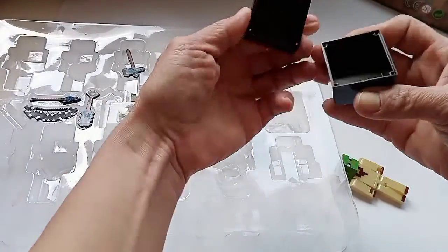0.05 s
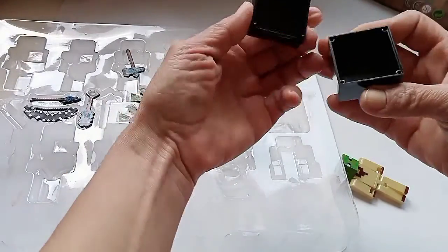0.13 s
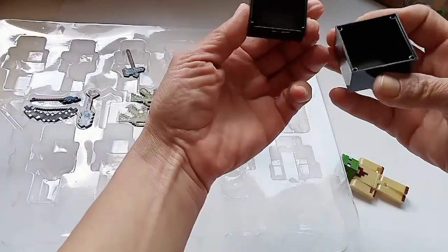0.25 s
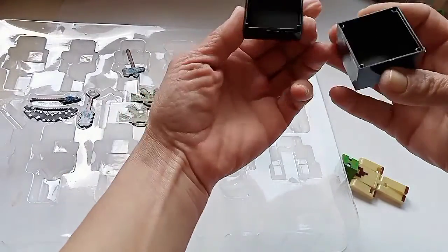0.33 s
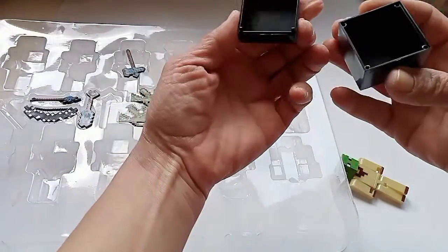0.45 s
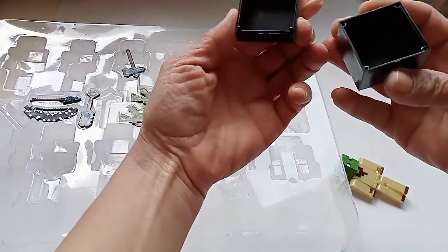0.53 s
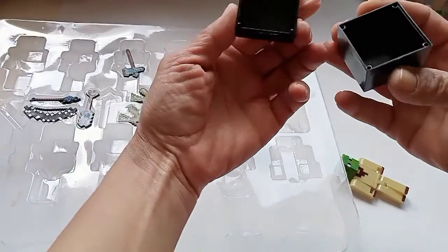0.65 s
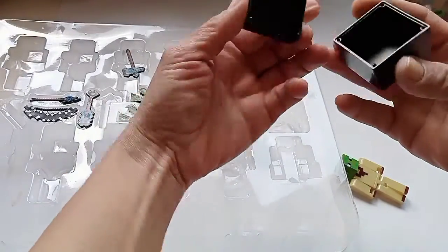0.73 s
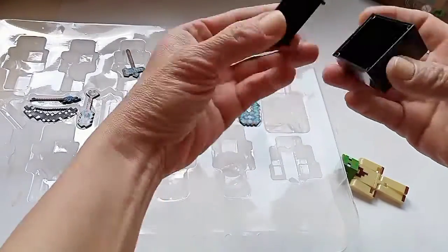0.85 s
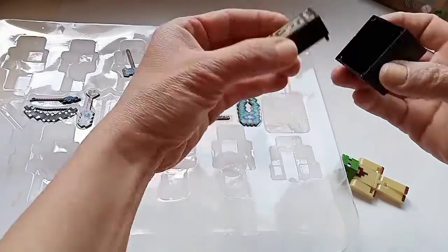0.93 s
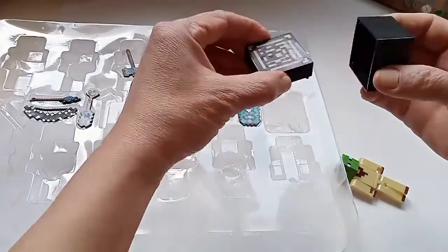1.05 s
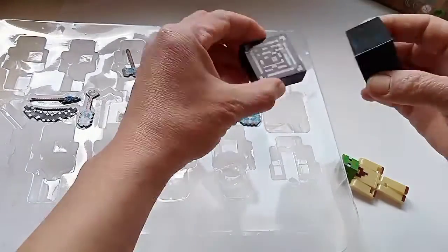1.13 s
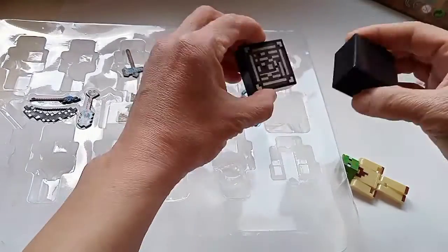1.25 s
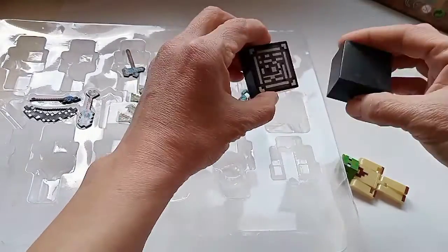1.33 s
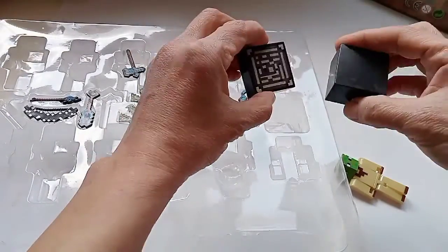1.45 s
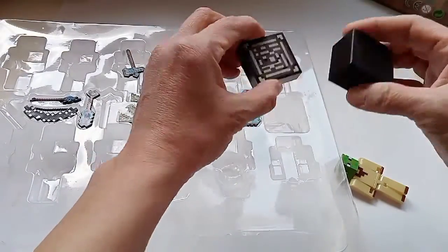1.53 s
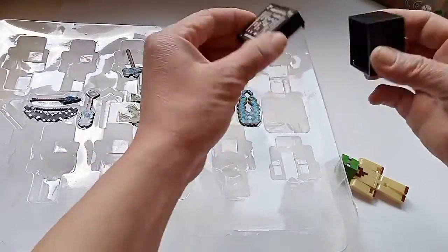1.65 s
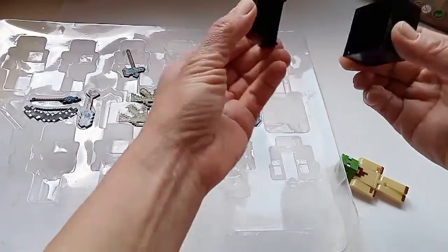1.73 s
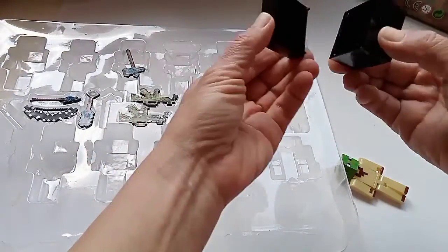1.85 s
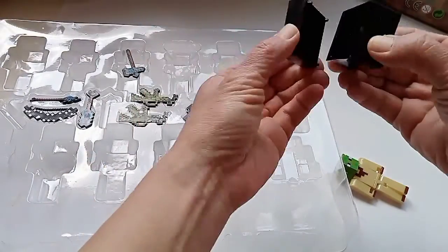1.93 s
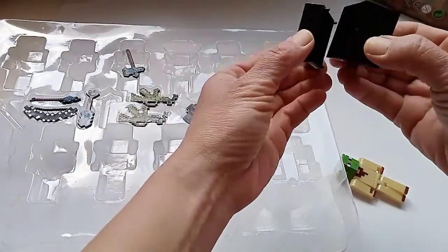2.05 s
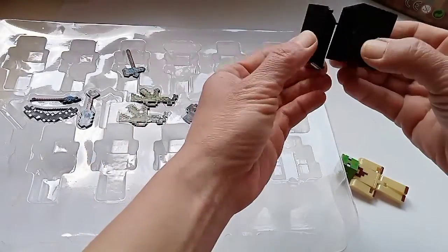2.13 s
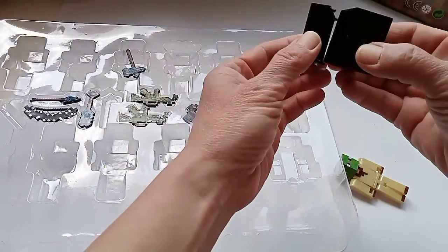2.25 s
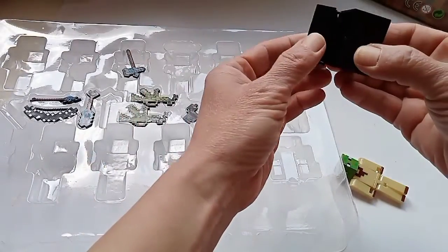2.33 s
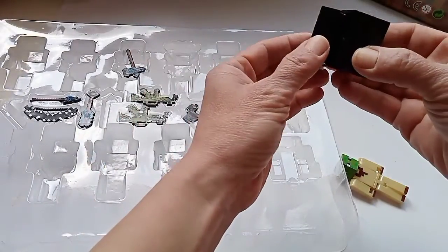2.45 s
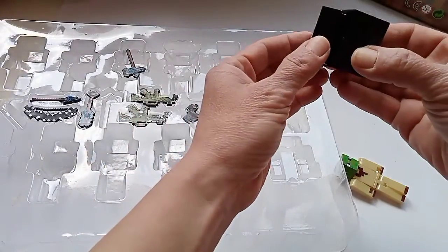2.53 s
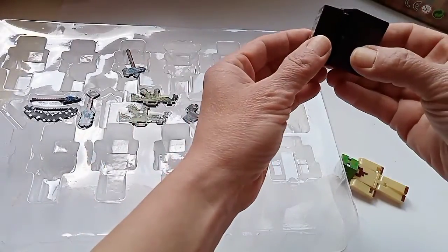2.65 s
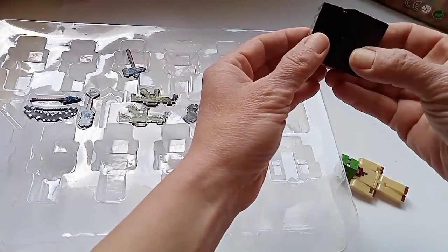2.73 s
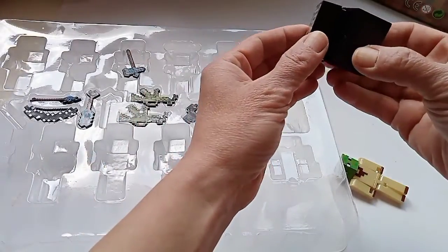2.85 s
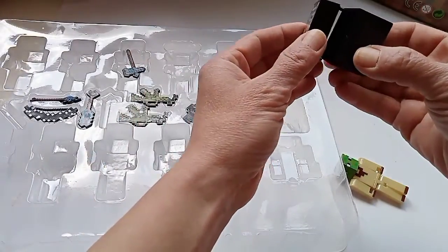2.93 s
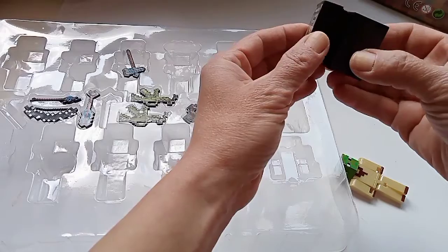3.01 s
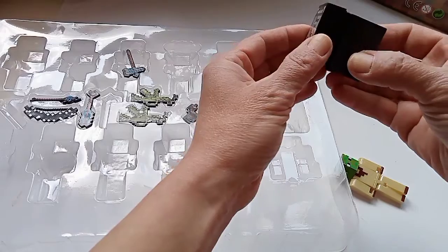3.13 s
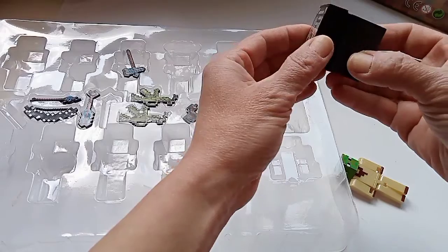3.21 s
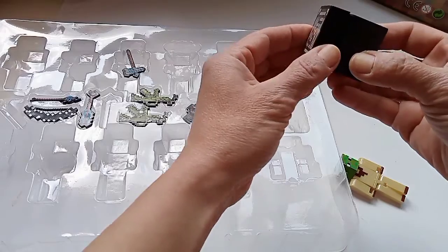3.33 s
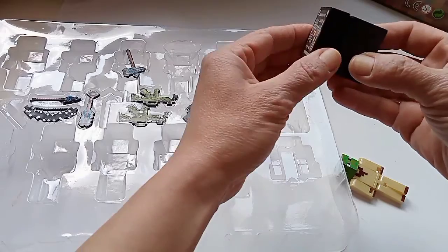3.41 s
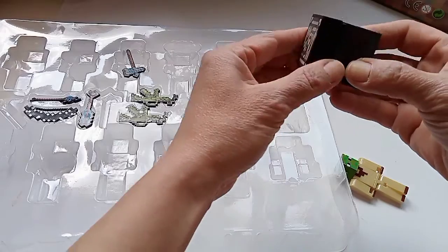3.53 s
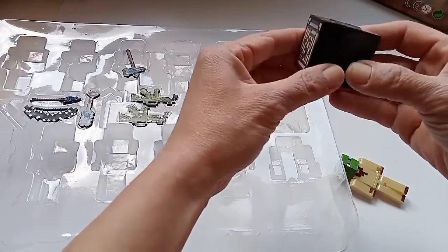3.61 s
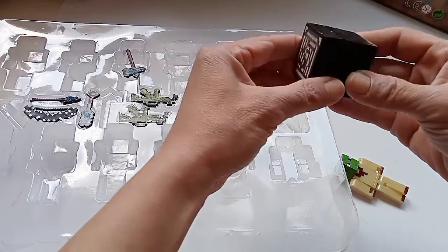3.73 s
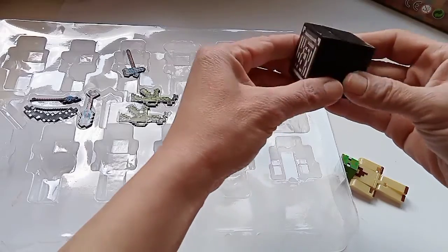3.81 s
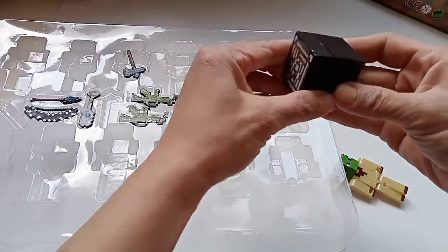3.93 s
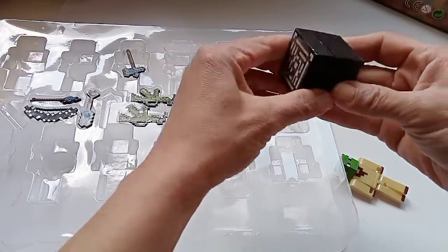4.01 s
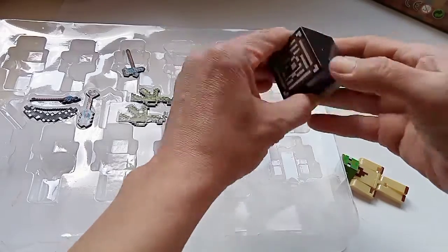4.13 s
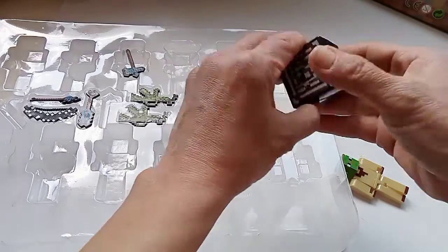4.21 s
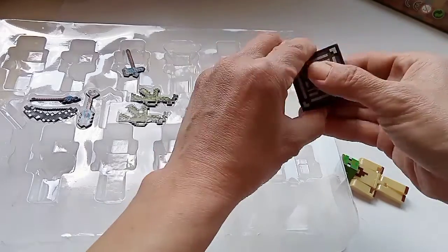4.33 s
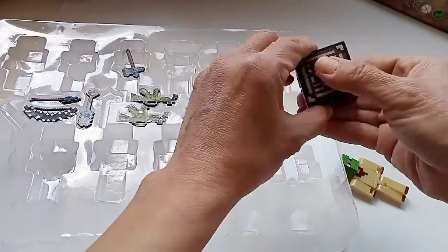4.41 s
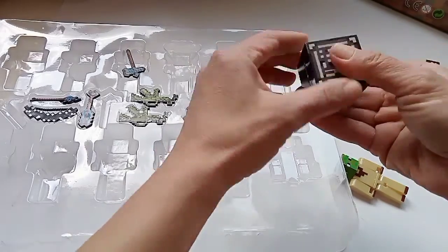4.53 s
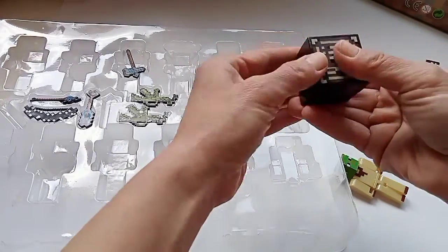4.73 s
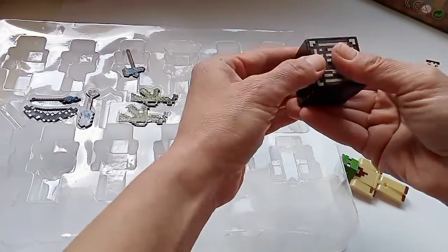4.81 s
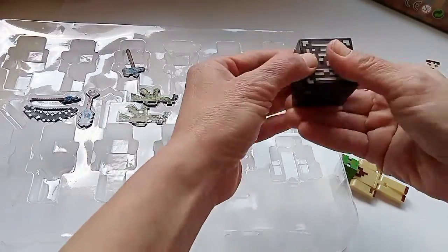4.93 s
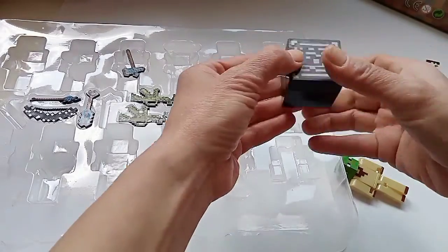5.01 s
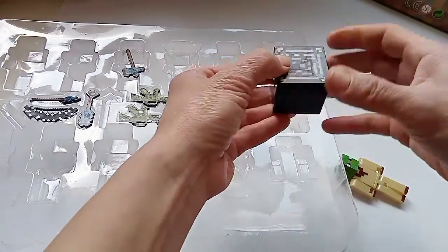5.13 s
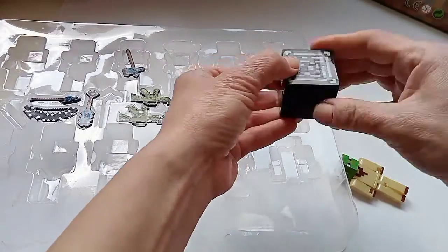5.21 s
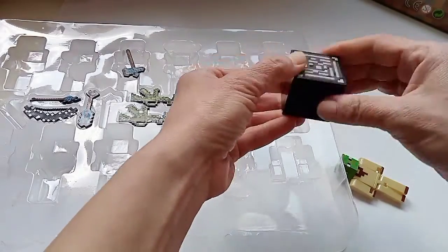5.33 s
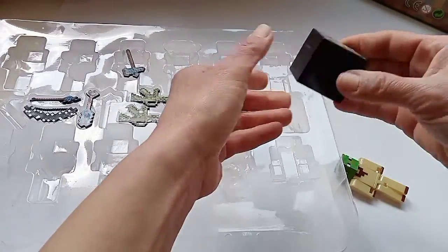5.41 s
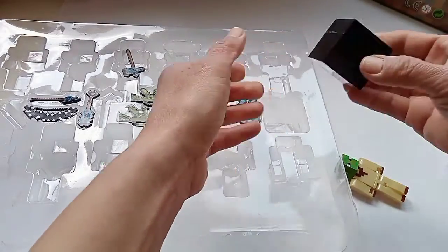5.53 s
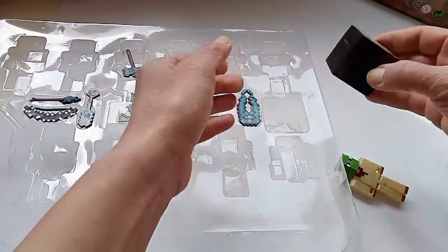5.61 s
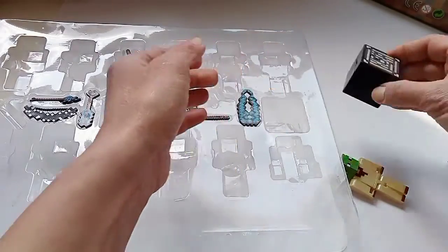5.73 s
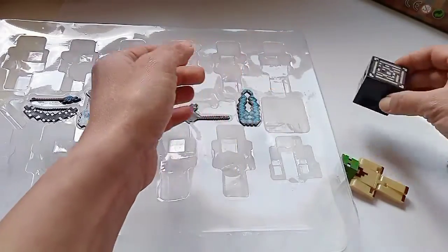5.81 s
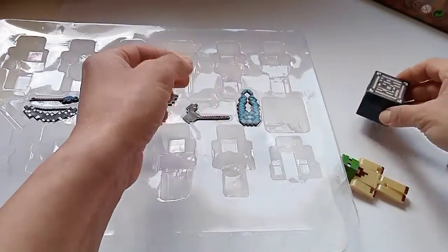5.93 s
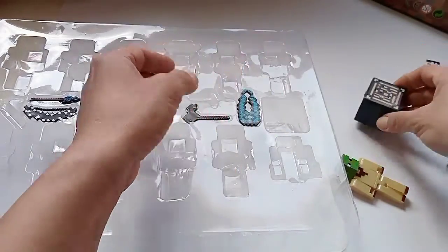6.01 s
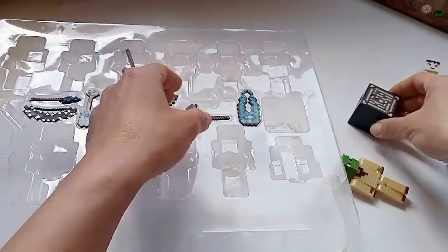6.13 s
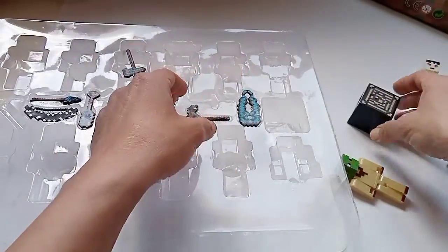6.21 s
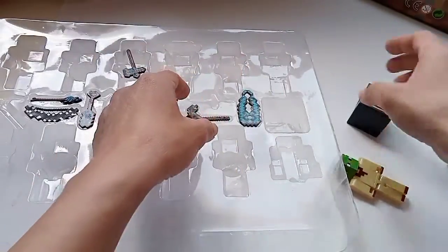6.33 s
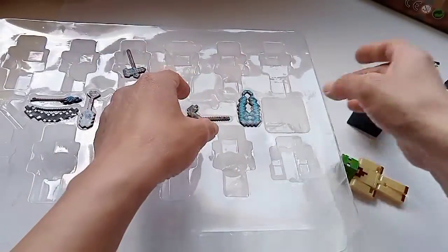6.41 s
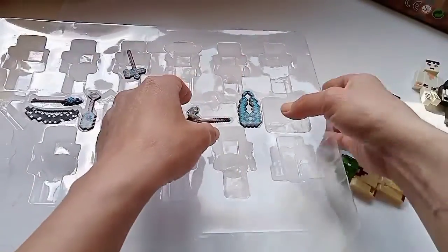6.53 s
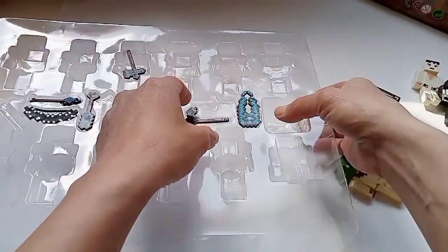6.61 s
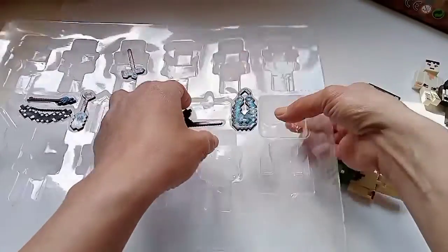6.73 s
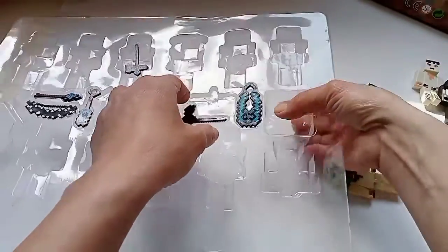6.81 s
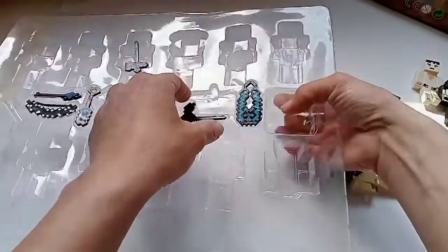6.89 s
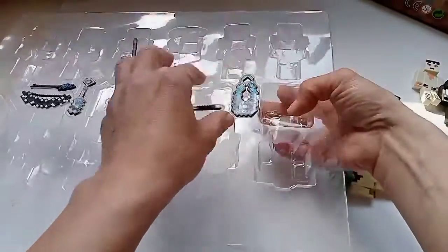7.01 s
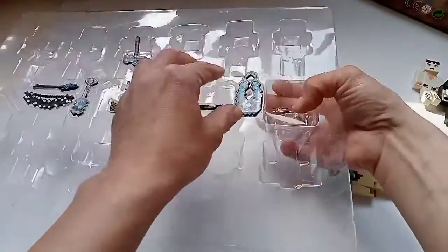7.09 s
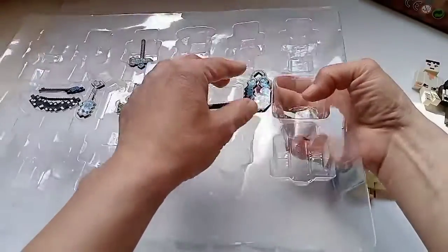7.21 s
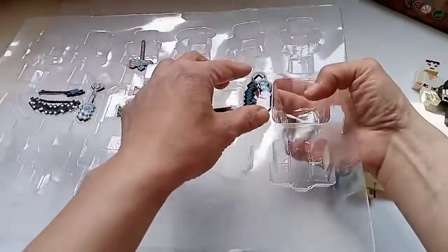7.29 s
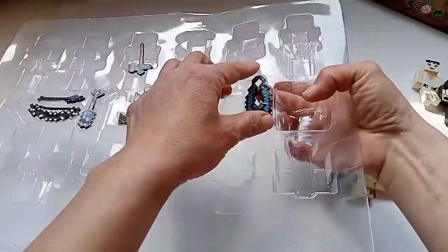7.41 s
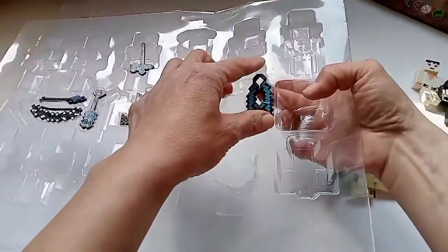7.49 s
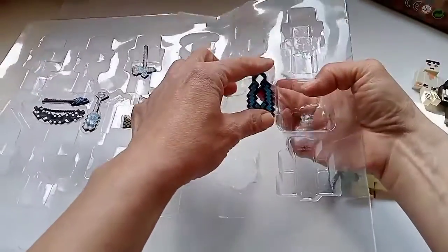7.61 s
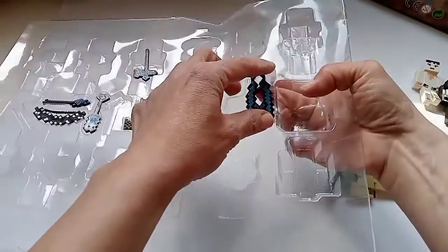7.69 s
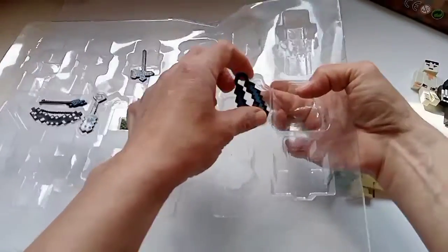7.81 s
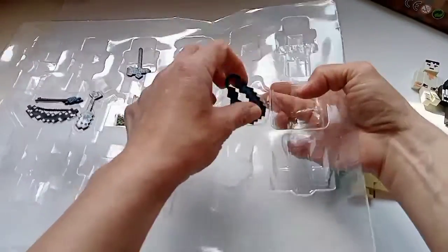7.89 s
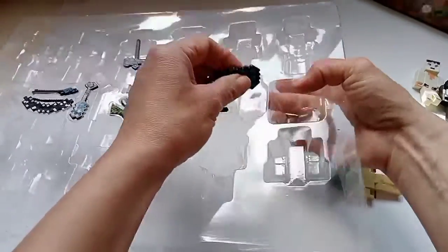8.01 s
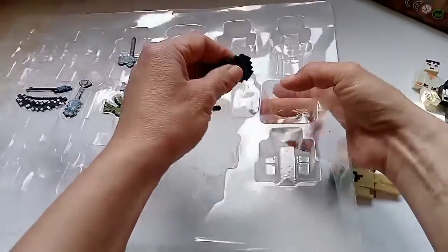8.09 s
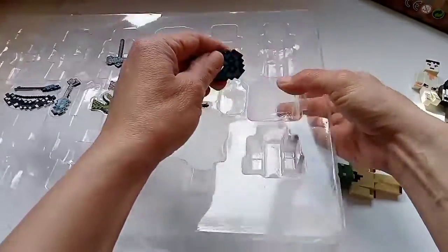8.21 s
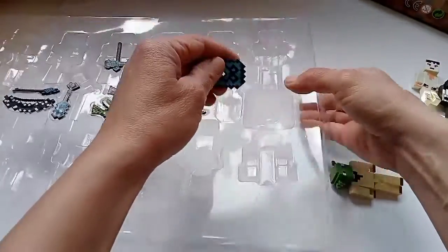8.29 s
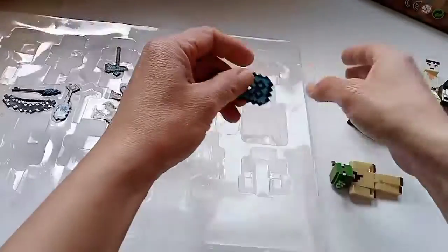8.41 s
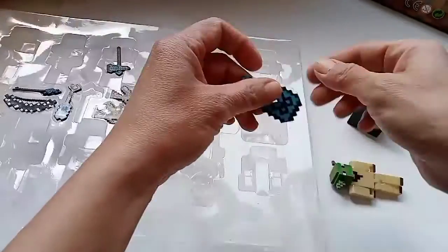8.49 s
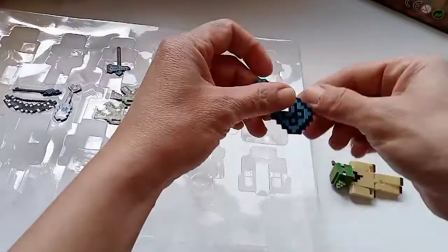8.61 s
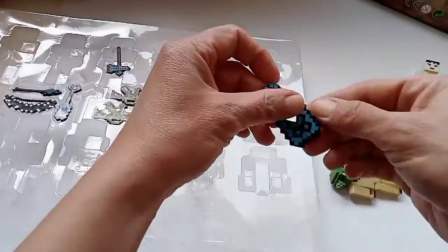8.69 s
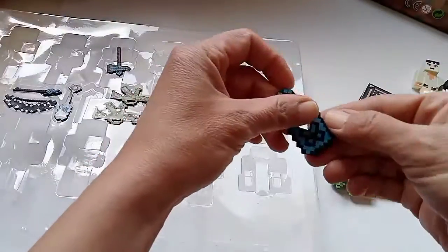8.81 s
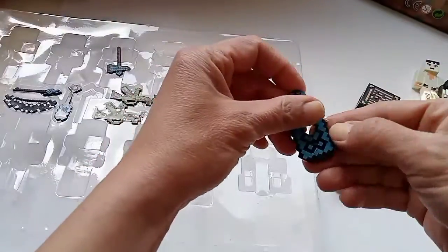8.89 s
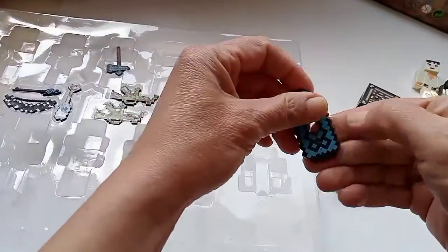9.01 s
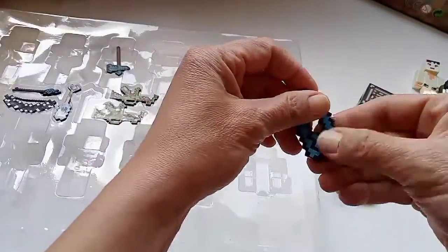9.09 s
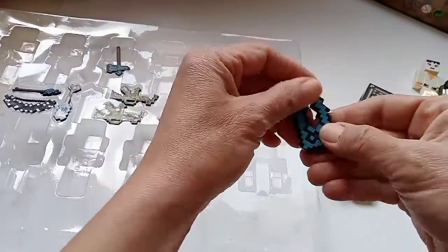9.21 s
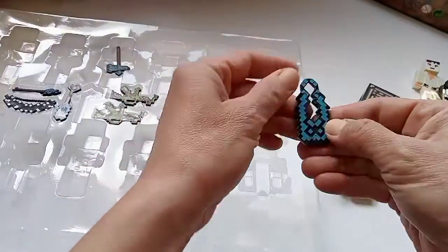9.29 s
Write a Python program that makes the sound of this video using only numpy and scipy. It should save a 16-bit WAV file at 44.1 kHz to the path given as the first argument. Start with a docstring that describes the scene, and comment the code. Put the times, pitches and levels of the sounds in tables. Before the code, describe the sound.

Close up in a small room, fingers rub faintly on a little hollow plastic box. Light ticks come first, then a quick, strengthening series of hard clicks as its lid is pressed home. After a quiet gap, a stiff blister sheet bends with loud irregular crackles, sharp pops and creaks, ending in a short dragging rustle and quiet. Faint air noise stays beneath.

```python
"""First, hands turn a small hollow plastic box, click its lid home and set it on a table: bursts of modes.
Then they bend a stiff plastic blister sheet to pry a piece out: it creaks, rumbles and snaps as
random slips and sudden bursts excite its pockets. Fingers rustle and rub by filtered friction noise.
A small room answers with a diffuse echo over faint steady air noise, and the recorder's limiter
ducks round the sharpest peaks."""
import sys
import numpy as np
from scipy import signal
from scipy.io import wavfile
from scipy.ndimage import uniform_filter1d, minimum_filter1d

SR = 44100
rng = np.random.default_rng(int(sys.argv[2]) if len(sys.argv) > 2 else 0)


def file_out(sig):
    """Save sig as 16-bit WAV at sys.argv[1]."""
    # one column per channel
    cols = np.atleast_2d(sig).T
    # limit, then scale
    lim = np.clip(cols, -1, 1)
    pcm = np.round(lim * 32767).astype(np.int16)
    wavfile.write(sys.argv[1], SR, pcm)


N = 412315
TAPS = 4096  # samples in a burst or filter
HZ = np.fft.rfftfreq(TAPS, 1 / SR)
AGE = np.arange(TAPS) / SR  # seconds since a burst began
TIME = np.arange(N) / SR

# Knocks of the box. Each row: start in seconds, body level in dB, body centre in Hz,
# level of the bright crack in dB.
BOX_KNOCKS = [(0.0935, -49, 4170, -45.5), (2.2893, -40, 1830, -55.5), (2.3565, -33, 1680, -54),
              (2.483, -40, 1710, -61), (2.609, -42.5, 1910, -53.5), (2.6797, -44.5, 1820, -77),
              (2.7245, -44, 2050, -51.5), (2.835, -70, 5900, -68), (2.8655, -64, 6200, -77),
              (3.0834, -27, 1840, -46.5), (3.0867, -26.5, 1920, -51.5), (3.107, -27.5, 1740, -51),
              (3.1806, -28, 1700, -51.5), (3.1983, -31.5, 1560, -59.5), (3.2674, -35.5, 1660, -62),
              (3.317, -24, 1710, -57), (3.3195, -21.5, 1870, -41.5), (3.621, -23, 1700, -49),
              (3.6254, -13, 1790, -36), (3.756, -26.5, 1570, -36), (3.7593, -26, 1490, -32),
              (3.78, -26, 1440, -45), (3.808, -21, 1540, -34), (3.8668, -23, 1530, -27),
              (3.9308, -21, 1418, -25.5), (4.35, -25, 1320, -31), (4.372, -28, 1180, -32.5),
              (4.4349, -24.5, 1130, -27.5), (4.5325, -21.5, 1330, -22), (4.6928, -19.5, 2000, -16),
              (4.7519, -17, 2440, -12), (5.0385, -39, 2830, -36.5), (5.2816, -56, 2430, -58),
              (6.1186, -52.5, 2210, -44), (6.211, -42, 856, -56)]
# The sheet buckling. Each row: start in seconds, strength in dB, tilt in dB per octave
# (wide panels are dull, tight creases bright).
SHEET_SNAPS = [(6.5937, -35.5, 3), (6.691, -44, 11), (6.7036, -28, -5.5), (6.7157, -24, -1.5),
               (6.7528, -26, 4.5), (6.7724, -21, 0.5), (6.784, -12, 0.4), (6.8251, -23.5, 1),
               (6.8317, -19, 2), (6.8357, -19, 0.5), (6.9029, -23, 3), (6.9252, -19.5, -3.5),
               (6.9347, -24.5, 6), (6.9389, -13, 0.7), (6.9575, -30.5, -4.5), (6.9972, -35, 5),
               (7.0327, -14, -1.7), (7.0524, -49, 14.5), (7.1356, -28, 5.5), (7.1534, -24, -1),
               (7.1651, -18.5, 4), (7.1661, -17.5, 0.5), (7.213, -31.5, 12), (7.2399, -36, 7),
               (7.2719, -21, 1.1), (7.281, -37, 8), (7.3294, -37.5, 1), (7.422, -31.5, -1),
               (7.4345, -32.5, 6.5), (7.4492, -22, 5.5), (7.454, -27.5, 6), (7.472, -30, 6),
               (7.5077, -18.5, 5), (7.5638, -24.5, 0.3), (7.6093, -36.5, -6.5), (7.6223, -27.5, -3.7),
               (7.6335, -21.5, .2), (7.6672, -20, -1), (7.6721, -14.5, -0.3), (7.7237, -13, 1.4),
               (7.7288, -30.5, 8.5), (7.8496, -19, 3), (7.9252, -34, 4.2), (7.9475, -19.5, 2.5),
               (7.9745, -25.5, 5.5), (7.982, -21.5, 2), (8.0185, -25.5, -5.5), (8.0373, -19, 1.6),
               (8.0562, -20.5, -1.5), (8.0667, -18, 2.7), (8.0735, -18, 1), (8.1213, -14.5, 0.5),
               (8.1431, -34, 5), (8.1624, -26, 1), (8.1975, -20.5, 4.2), (8.4228, -19.5, 0.2),
               (8.4476, -33, 5.5), (8.6199, -42, -0.3), (8.721, -46.5, 9), (8.728, -29, 4)]
# Parts of every snap: panel, crease, crack, fizz. Each row: level in dB against the strength,
# distance in octaves from the tilt's pivot.
SNAP_PARTS_DB = [(-6, -2.14), (-1.6, -1.28), (-2, 0.19), (-4.5, 1.79)]
# How hard the hands bend the sheet. Each row: time in seconds, level in dB.
HAND_STRAIN = [(6.514, -34.5), (6.67, -33.5), (6.8, -23), (6.95, -27), (7.1, -32), (7.25, -35), (7.42, -35),
               (7.49, -42.5), (7.62, -29.5), (7.72, -38), (7.83, -39.5), (7.9, -26.5), (8.0, -38),
               (8.05, -20.5), (8.11, -35.5), (8.17, -24), (8.21, -32), (8.42, -24.5), (8.58, -42.5),
               (8.72, -56.5)]
# The sheet dragging over the table as it is gripped and let go. Each row: start in seconds,
# length in seconds, level in dB, tilt above 500 Hz in dB per octave.
TABLE_DRAGS = [(6.516, 0.042, -23, 0), (8.253, 0.02, -25.5, -1.5), (8.336, 0.13, -24.5, -2.5)]
# Fingers sliding on plastic. Each row: middle in seconds, standard deviation of the bell in seconds,
# level in dB before the rustle's overall gain.
FINGER_STROKES = [(0.097, 0.013, -49), (0.316, 0.051, -58), (.574, 0.011, -60), (0.73, 0.055, -59),
                  (1.017, .015, -57), (1.05, 0.11, -55), (1.654, 0.032, -55), (1.811, 0.061, -54.5),
                  (3.196, .015, -56), (3.342, 0.036, -54), (3.512, 0.019, -49.5), (4.094, 0.015, -49.5),
                  (4.292, .047, -53), (4.962, 0.016, -37), (5.03, 0.018, -37.5), (5.285, 0.0085, -49.5),
                  (5.376, 0.024, -46), (6.154, 0.016, -45.5), (6.215, 0.03, -52), (8.981, 0.0081, -55),
                  (9.26, 0.042, -57.5)]
# Rubs that set a surface singing, from low groans to thin squeaks. Each row: middle in seconds,
# standard deviation of the bell in seconds, level in dB, resonance in Hz, its width in Hz.
SINGING_RUBS = [(1.025, .016, -64, 4320, 250), (1.067, 0.072, -61, 5880, 400), (1.098, .19, -78, 2530, 300),
                (1.66, 0.023, -59.5, 2570, 220), (2.601, 0.17, -63, 1850, 500),
                (2.602, .1, -67, 6000, 1200), (3.14, 0.031, -45.5, 1900, 994),
                (3.299, 0.14, -59.5, 90, 91.6), (3.502, 0.027, -43, 1770, 583),
                (3.691, .047, -46.5, 1650, 352), (3.94, 0.016, -53.5, 1010, 250),
                (4.442, .027, -44.5, 785, 200.8), (6.22, 0.045, -51, 700, 606),
                (7.064, 0.037, -31.5, 616, 159), (8.416, 0.076, -26.5, 910, 667),
                (8.573, 0.029, -38.5, 664, 202.5), (8.739, 0.008, -34.5, 6530, 1872)]
# Colour of the sheet. Each row: frequency in Hz, relative density in dB per Hz.
SHEET_COLOUR = [(40,-24.5),(110,-16.5),(240,-13),(370,-2.5),(700,-4.5),(1070,-0.5),(1760,-5.5),(2600,-4.5),(3300,-8.5),(4700,-6),(7600,-12),(9400,-4),(12000,-17.5),(16000,-21)]
# A sharp click of the box with its wall resonances. Each row: frequency in Hz, relative density in dB per Hz.
CRACK_COLOUR = [(2900,-6),(3250,-2),(3800,0),(4400,-2.5),(4750,-0.5),(5250,4.5),(6500,-4),(7300,-4),(8000,-4.5),(9900,0.5),(11500,-13.5),(16000,-18.5)]
# Skin on the box with its wall resonances. Each row: frequency in Hz, relative density in dB per Hz.
SKIN_COLOUR = [(900, -17), (2100, -12), (2580, -0.5), (3100, -11.5), (4300, -5), (5200, -8.5), (5900, -5),
               (7000, -9), (8300, -7.5), (9400, 4.5), (11000, -11), (16000, -12)]
# Still room air. Each row: frequency in Hz, relative density in dB per Hz.
AIR_COLOUR = [(20,-20),(45,-9),(86,-1),(194,0.5),(300,-4.5),(600,-7.5),(1320,-13),(5000,-18),(7670,-24.5),(9460,-18.5),(11100,-25.5),(16000,-32)]
# Late decay of the room. Each row: frequency in Hz, time to fall 60 dB in seconds.
LATE_T60 = [(200,1.3),(800,0.97),(2000,1),(5000,1.1),(9000,0.68),(15000,0.97)]
# Strength of the room. Each row: frequency in Hz, level of the echo in dB against the sound sent to it.
ECHO_DB = [(150,-9),(700,-9.5),(2000,-15),(5000,-12.5),(9500,-14.5),(15000,-13.5)]

# A knock's hardness is its crack over its body; hard knocks and low knocks ring over a wider band.
# The reach is the distance from the body's centre at which its gain is 7 dB down.
BODY_HZ, BODY_REACH_OCTAVES, MIN_REACH_OCTAVES = 1700, 0.32 * 2.62, 0.1 * 2.62
WIDEN_HARDNESS_DB, WIDEN_WITH_DEPTH = 22, 0.52  # dB of hardness, and power per octave down, for the reach
# The thud's level is set against the mean of body and crack; low knocks thud more.
THUD_DB, THUD_DB_PER_OCTAVE = -16.5, -14
# Cracks above this level tilt up, by at most so many dB per octave; weaker ones tilt down.
BRIGHT_FROM_DB, BRIGHT_MAX_DB = -36.5, 5.5
# Each snap leaves the sheet shaking: dB against the snap, seconds to fall 60 dB.
SHUDDER_DB, SHUDDER_T60 = -19.5, 0.25
WOBBLE_DB, CRACKLE_DB = -1.5, -6.5  # both against the strain
DRAG_ATTACK_S, DRAG_RELEASE_T60 = 0.0028, 0.23
EDGE_HZ = 15700  # upper band limit of the recorder


def amp(db):
    """Decibel law: level in dB to amplitude gain."""
    return 10 ** (np.asarray(db) / 20)


def unit(x):
    """Normalisation of power: scales a signal to rms 1."""
    return x / np.sqrt(np.mean(x ** 2) + 1e-20)


def read(points, hz):
    """Interpolation of a spectrum on a logarithmic frequency axis."""
    f, value = np.transpose(points)
    return np.interp(np.log(hz + 1), np.log(f + 1), value)


def level(rows, column):
    """Envelope: a curve in dB becomes a gain over time, silent outside its span."""
    rows = np.asarray(rows)
    return amp(np.interp(TIME, rows[:, 0], rows[:, column], left=-200, right=-200))


def add(mix, s, sound):
    """Superposition: adds a sound into the mix from time s."""
    part = mix[max(round(s * SR), 0):][:len(sound)]
    part += sound[:len(part)]


def band(lo_hz, hi_hz, order=8):
    """Band-pass response with smooth, steep sides."""
    return 1 / np.sqrt((1 + (lo_hz / (HZ + 1)) ** order) * (1 + (HZ / hi_hz) ** order))


def colour(x, gain):
    """Minimum-phase filtering: a causal filter rings after a click, never before."""
    log_gain = np.log(np.maximum(gain / gain.max(), 1e-5))
    circle = np.concatenate([log_gain, log_gain[-2:0:-1]])
    # The Hilbert transform of the log gain gives the phase of the causal filter.
    taps = np.fft.ifft(np.exp(np.conj(signal.hilbert(circle)))).real
    return signal.oaconvolve(x, taps)[:len(x)]


def burst(gain, db, t60, kick):
    """Impulsive release: a first kick, then dense modes dying fast."""
    ring = unit(rng.standard_normal(TAPS) * amp(-60 * AGE / t60))
    ring[0] += kick * np.sqrt(TAPS) * rng.choice([-1, 1])
    per_10_ms = np.sqrt(SR / 100 / TAPS)  # db states the whole energy as an rms over 10 ms
    return amp(db) * unit(colour(ring, gain)) * per_10_ms


def grains(per_s, spread_db, t60):
    """Stick-slip as a random point process: tiny slips of uneven size, each a short puff of noise."""
    size_db = spread_db * np.minimum(rng.exponential(1, N), 3)
    size = amp(size_db) * (rng.random(N) < per_s / SR)
    power = signal.oaconvolve(size ** 2, amp(-120 * AGE / t60))[:N]  # power falls 60 dB in t60
    return np.sqrt(abs(power)) * rng.standard_normal(N)


def swell(t, s, half_s):
    """Gaussian envelope: a stroke speeds up and slows down in a bell shape."""
    return np.exp(-0.5 * ((t - s) / half_s) ** 2)


def box(brighten=0.35):
    """Impact excitation: the lid catches and slips, the hollow body knocks; harder slips crack and thud more."""
    out = np.zeros(N)
    crack = amp(read(CRACK_COLOUR, HZ)) * band(2800, 13000)
    thud = band(300, 540, order=3)
    octaves_above_5k = np.log2(np.maximum(HZ, 5000) / 5000)
    for s, body_db, hz, crack_db in BOX_KNOCKS:
        height = np.log2(hz / BODY_HZ)
        hardness_db = crack_db - body_db
        reach = BODY_REACH_OCTAVES * 2 ** (hardness_db / WIDEN_HARDNESS_DB - WIDEN_WITH_DEPTH * height)
        away = np.log2((HZ + 1) / hz) / max(reach, MIN_REACH_OCTAVES)
        body = (1 + away ** 4) ** -1.2
        thud_db = (body_db + crack_db) / 2 + THUD_DB + THUD_DB_PER_OCTAVE * height
        # A louder crack is a brighter one.
        tilt_db = min(brighten * (crack_db - BRIGHT_FROM_DB), BRIGHT_MAX_DB) * octaves_above_5k
        add(out, s, burst(body, body_db, t60=0.02, kick=1.1))
        add(out, s, burst(crack * amp(tilt_db), crack_db, t60=0.013, kick=0.5))
        add(out, s, burst(thud, thud_db, t60=0.016, kick=1.8))
    return out


def pocket():
    """Modal irregularity: each pocket has its own random peaks and dips, wider towards the treble."""
    knots = np.linspace(0, np.sqrt(SR / 2), 130)
    peaks_db = np.clip(5.5 * rng.standard_normal(len(knots)), -11, 8)
    return amp(np.interp(np.sqrt(HZ), knots, peaks_db))


def snaps():
    """Snap-through buckling: a pocket flips over, its panel and crease ring, and crack and fizz give the top."""
    out = np.zeros(N)
    sheet = amp(read(SHEET_COLOUR, HZ))
    panel, crease = sheet * band(45, 1270), sheet * band(1134, 2920)
    crack, fizz = sheet * band(3970, 7860), sheet * band(9270, 19000)
    for s, db, tilt_db in SHEET_SNAPS:
        part_levels = [db + part_db + tilt_db * octaves for part_db, octaves in SNAP_PARTS_DB]
        panel_db, crease_db, crack_db, fizz_db = part_levels
        modes = pocket()
        add(out, s, burst(panel * modes, panel_db, t60=0.016, kick=1.13))
        add(out, s, burst(crease * modes, crease_db, t60=0.018, kick=0.51))
        add(out, s, burst(crack * modes, crack_db, t60=0.015, kick=0.44))
        add(out, s, burst(fizz * modes, fizz_db, t60=0.0094, kick=0.65))
    return out


def strain():
    """Addition of powers: the bending of the hands plus the decaying shudder after each snap, as a gain."""
    power = level(HAND_STRAIN, column=1) ** 2
    dying = amp(-60 * np.arange(SR) / SR / SHUDDER_T60)
    for s, db, _ in SHEET_SNAPS:
        add(power, s, (amp(db + SHUDDER_DB) * dying) ** 2)
    return np.sqrt(power)


def flexing(count=8):
    """Stick-slip under strain: the bent sheet wobbles and crackles as slips land in pocket after pocket."""
    sheet = amp(read(SHEET_COLOUR, HZ))
    low, high = sheet * band(40, 2910, order=6), sheet * band(2900, 19000, order=6)
    slips = grains(per_s=300, spread_db=4.5, t60=0.022)
    ticks = grains(per_s=600, spread_db=4.5, t60=0.014)
    active = rng.integers(0, count, N)[(TIME * 50).astype(int)]  # a random pocket every 20 ms
    wobble, crackle = np.zeros(N), np.zeros(N)
    for k in range(count):
        modes = pocket()
        wobble += unit(colour(slips * (active == k), low * modes))
        crackle += unit(colour(ticks * (active == k), high * modes))
    movement = amp(WOBBLE_DB) * unit(wobble) + amp(CRACKLE_DB) * unit(crackle)
    return movement * strain()


def drags():
    """Sliding friction: the sheet on the table gives dense slips that start fast, hold and die away."""
    out, t = np.zeros(N), np.arange(SR) / SR
    slips = grains(per_s=2500, spread_db=3, t60=0.012)
    octaves_above_500 = np.log2(np.maximum(HZ, 500) / 500)
    for s, length_s, db, tilt_db in TABLE_DRAGS:
        gain = amp(read(SHEET_COLOUR, HZ) + tilt_db * octaves_above_500) * pocket()
        attack = np.minimum(t / DRAG_ATTACK_S, 1)
        release = amp(-60 * np.maximum(t - length_s, 0) / DRAG_RELEASE_T60)
        stretch = slips[rng.integers(N - SR):][:SR]
        add(out, s, amp(db) * attack * release * unit(colour(stretch, gain)))
    return out


def fingers():
    """Friction noise: skin drags over plastic in a fine, thin rustle, stroke by stroke."""
    slips = grains(per_s=2200, spread_db=3, t60=0.008)
    rustle = unit(colour(slips, amp(read(SKIN_COLOUR, HZ))))
    power = sum((amp(db) * swell(TIME, s, half_s)) ** 2 for s, half_s, db in FINGER_STROKES)
    return amp(-1) * rustle * np.sqrt(power)


def scrapes():
    """Driven resonance: friction feeds one resonance of the plastic for as long as the rub lasts."""
    out, t = np.zeros(N), np.arange(SR) / SR
    for s, half_s, db, hz, width_hz in SINGING_RUBS:
        resonance = 1 / (1 + (2 * (HZ - hz) / width_hz) ** 4)
        sing = unit(colour(rng.standard_normal(SR), resonance))
        add(out, s - 0.5, amp(db) * sing * swell(t, 0.5, half_s))
    return out


def room(x, early_share=0.65, early_t60=0.15, size=1024):
    """Diffuse reverberation: each band's power lingers and dies at its own speed, its phase scrambled."""
    hop = size // 8
    hz, _, z = signal.stft(x, SR, nperseg=size, noverlap=size - hop)
    power = np.pad(abs(z) ** 2, ((0, 0), (4, 0)))[:, :z.shape[1]]  # the echo comes four hops late
    # Power kept from one hop to the next.
    early = amp(-120 * hop / SR / early_t60)
    late = amp(-120 * hop / SR / read(LATE_T60, hz))
    share = np.clip(early_share, 0, 1)
    tail = share * signal.lfilter([1 - early], [1, -early], power)  # table and near walls
    # The late treble is spread over neighbouring bands into an even hiss.
    smooth = uniform_filter1d(power, size=41, axis=0).clip(0)
    spread = np.where(hz[:, None] > 3000, smooth, power)
    late_tail = [signal.lfilter([1 - kept], [1, -kept], p) for kept, p in zip(late, spread)]
    tail += (1 - share) * np.array(late_tail)
    noise = signal.stft(rng.standard_normal(N), SR, nperseg=size, noverlap=size - hop)[2]
    echo = noise / np.std(noise) * np.sqrt(tail) * amp(read(ECHO_DB, hz))[:, None]
    return signal.istft(echo, SR, nperseg=size, noverlap=size - hop)[1][:N]


def air():
    """Stationary noise: the faint steady sound of room air."""
    return amp(-62.5) * unit(colour(rng.standard_normal(N), amp(read(AIR_COLOUR, HZ))))


def scene():
    """Superposition of direct and reverberant sound: box, sheet and fingers in one small room."""
    cube = box()
    sheet = snaps() + flexing() + drags()
    rub = fingers() + scrapes()
    echo = room(amp(1.5) * cube + sheet + amp(2) * rub)
    return (cube + sheet + rub + echo + air())[None]


def record(dry, ceiling=1.094, ahead_s=0.02):
    """Peak limiting: the gain ducks ahead of the sharpest peaks; what is left clips; then the band limit."""
    span = int(ahead_s * SR)
    allowed = np.minimum(1, ceiling / (abs(dry[0]) + 1e-9))
    gain = uniform_filter1d(minimum_filter1d(allowed, 2 * span + 1), span)
    limited = dry * np.roll(gain, -(span // 2))
    clipped = limited / (1 + limited ** 12) ** (1 / 12)  # bends over close to full scale
    low_pass = signal.firwin(401, EDGE_HZ, window=("kaiser", 9), fs=SR)
    return signal.oaconvolve(clipped, low_pass[None], "same")


dry = scene()
out = record(dry)
file_out(out)
```